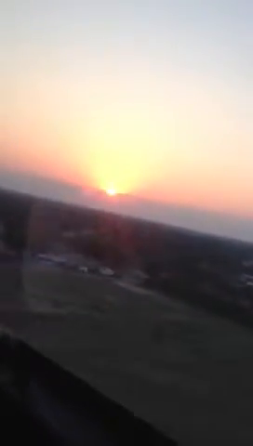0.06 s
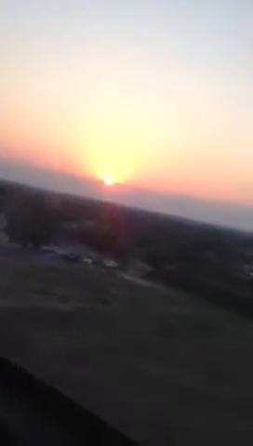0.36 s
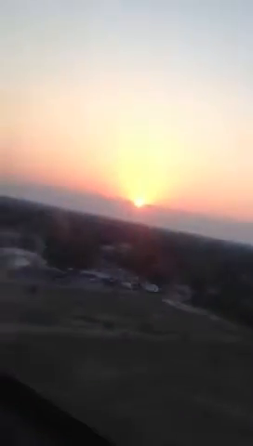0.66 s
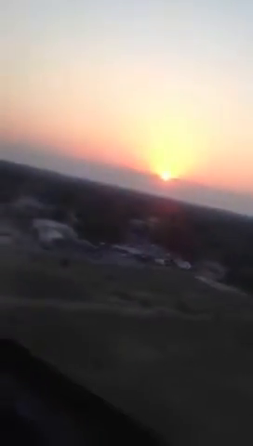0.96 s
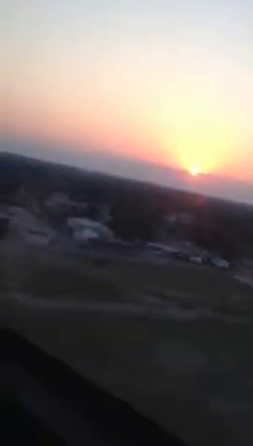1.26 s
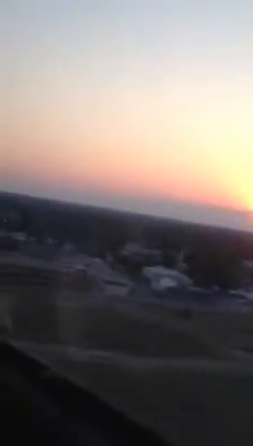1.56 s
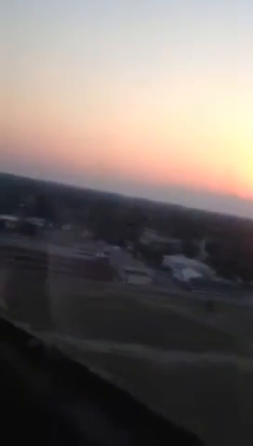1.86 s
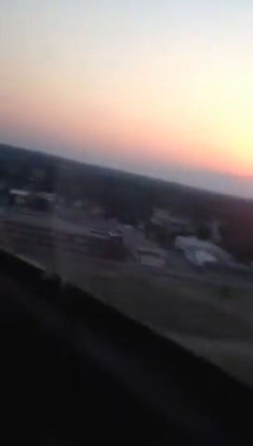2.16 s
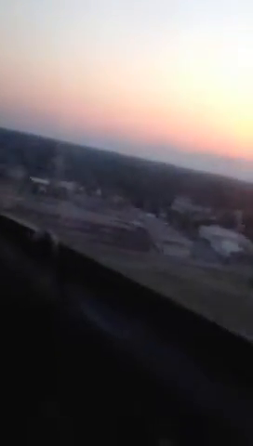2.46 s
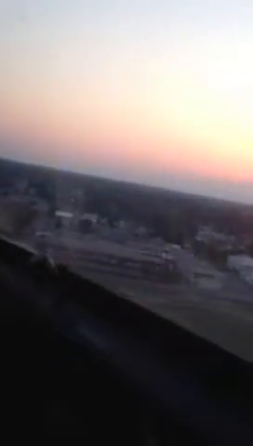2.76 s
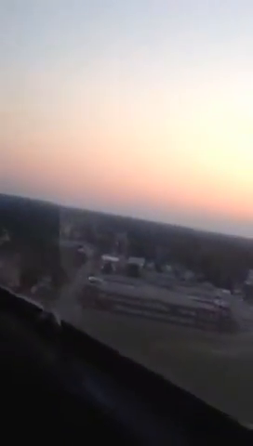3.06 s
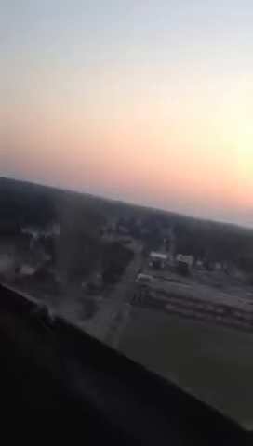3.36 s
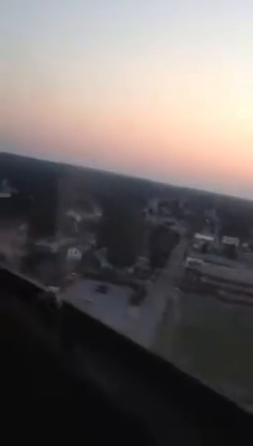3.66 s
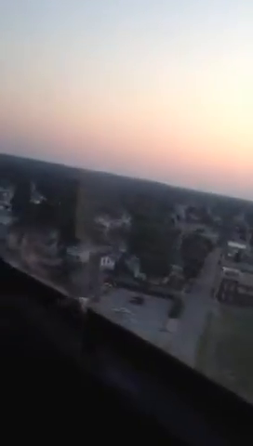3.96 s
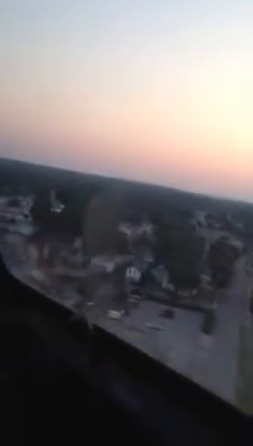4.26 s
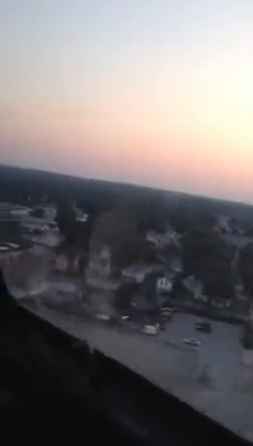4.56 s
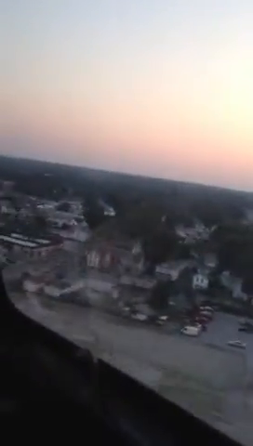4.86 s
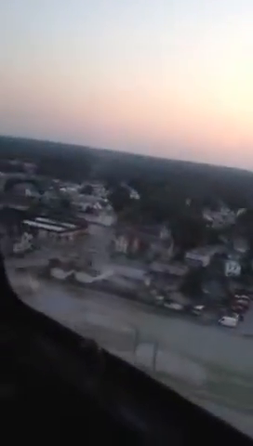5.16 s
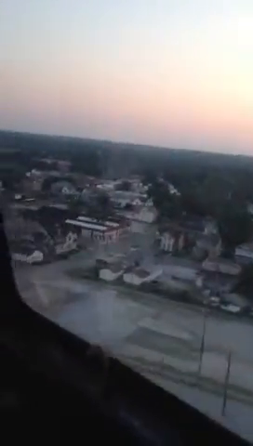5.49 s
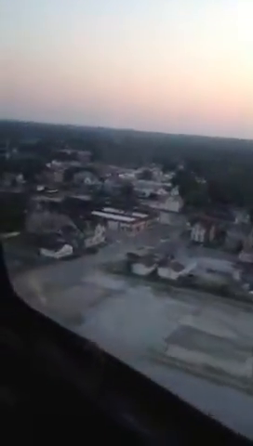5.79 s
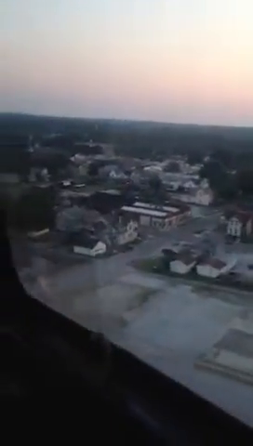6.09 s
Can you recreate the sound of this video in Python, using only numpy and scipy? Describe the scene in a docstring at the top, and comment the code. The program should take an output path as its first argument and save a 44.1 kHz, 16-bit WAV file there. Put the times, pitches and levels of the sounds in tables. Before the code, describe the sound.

A small helicopter's piston engine drones loudly and close for the whole six seconds, heard through one microphone at a seat inside the cabin in level flight. Its low pitch barely moves, but the boom swells around 0.6 to 1.5 seconds, again near 2.8, and most strongly at about 4.2, then eases near 5. Beneath it the cabin shell rumbles steadily, with faint, wavering tones from the gears and tail rotor. Overhead, the blades push gusts over the cabin in a fast, even chop, about thirteen or fourteen a second, each followed by a thin, high whistling hiss through the door seals. The gusts grow a little stronger around 3.5 and 5.3 seconds. Brief blade slaps, hollow thuds with a slight crack, come softly at 0.5 and 0.8 seconds, cluster from 3.3 to the strongest at 3.7, then recur now and then until 5.9.

```python
"""A six-cylinder engine drones close by, heard from a seat inside a small piston helicopter in level flight.
The drone booms louder whenever the engine runs a little faster; tail rotor and gear tones keep in step.
Overhead, each pass of the two main blades pushes a gust over the cabin and a whistling hiss through
the door seals; now and then a blade slaps. All around the single microphone the cabin shell rumbles."""
import sys
import numpy as np
from scipy import signal
from scipy.fft import rfft, irfft
from scipy.io import wavfile
from scipy.ndimage import uniform_filter1d, minimum_filter1d

SR = 44100
rng = np.random.default_rng(int(sys.argv[2]) if len(sys.argv) > 2 else 0)


def transcribe(u):
    """Save the signal u as a 16-bit wav file named by the first command-line argument.

    u: samples, shape (n,) or (channels, n), limited to [-1, 1]; the rate is SR.
    q: integer samples, one column per channel.
    """
    v = np.clip(np.atleast_2d(u).T, -1, 1)
    q = np.round(v * 32767).astype(np.int16)
    wavfile.write(sys.argv[1], SR, q)


N = 270333
TIME = np.arange(N) / SR


# engine speed in level flight: (time [s], firing rate [Hz])
ENGINE_SPEED = [(0.0, 135.5), (0.6, 136.47), (1.3, 136.3), (1.85, 135.03), (2.6, 136.19), (3.3, 135.37),
                (4.05, 137.11), (4.8, 134.78), (5.6, 135.54), (6.13, 136.02)]
# lines of the uneven cylinders, from the seat: (multiple of the six-firing cycle, level [dB])
CYLINDER_LINES = [(5, -32.5), (7, -37), (9, -35.5), (11, -45.5), (12, -33), (13, -39.5), (14, -43.5),
                  (15, -40.5), (16, -44), (18, -45.5), (20, -54), (21, -41), (24, -38.5), (26, -49.5),
                  (27, -45.5), (28, -60.5), (29, -52), (30, -51), (39, -58), (42, -58.5), (48, -57.5),
                  (51, -63), (54, -56), (66, -54.5)]

def engine(firings, blades, db_per_hz=1.7, lag_s=0.18):
    """The firing tone booms, swells with speed and throbs with the rotor; unequal cylinders add lines."""
    firing_hz, = follow(ENGINE_SPEED)
    excess_hz = np.interp(TIME - lag_s, TIME, firing_hz - firing_hz.mean())
    boom_db = -9.5 + db_per_hz * excess_hz + 0.4 * wander(4.2)
    # level and phase move once per blade and once per rotor turn
    throb_db = 0.55 * np.cos(2 * np.pi * (blades - .21)) + 0.67 * np.cos(np.pi * (blades + 0.13))
    sway = 0.11 * np.cos(2 * np.pi * (blades - .42)) + 0.036 * np.cos(np.pi * (blades - .54))
    boom = gain_of(boom_db + throb_db + 0.5 * wander(37)) * np.sin(2 * np.pi * firings + sway)
    cycles = firings / 6
    lines = sum(gain_of(db) * tone(k * cycles, waver_db=2.0, waver_hz=13.0) for k, db in CYLINDER_LINES)
    return boom + lines


# rotor air at the microphone: (time [s], relative gust level [dB], hiss level [dB])
AIR_LEVELS = [(0.0, -34, -42), (1.3, -34, -43), (2.4, -32.5, -41), (3.5, -29.5, -42), (4.5, -34, -42.5),
              (5.3, -30, -41), (6.13, -33, -43.5)]

def rotor_wash(firings, blades):
    """Each blade sends a gust over the cabin; the door seals hiss just after it."""
    gust_db, hiss_db = follow(AIR_LEVELS)
    return gain_of(gust_db + 2.5) * gusts(firings, blades) + gain_of(hiss_db) * seal_hiss(blades)


# gusts on the cabin, just overhead: (frequency [Hz], relative level [dB])
GUST_SPECTRUM = [(100, -22), (250, 3.5), (480, 0), (680, -2.5), (880, -15), (1150, -11), (1850, -19),
                 (2100, -23), (2650, -26), (3400, -28.5), (4300, -32.5), (7000, -27.5), (15000, -65)]
# resonances of the panels around the seat: (frequency [Hz], width [Hz], lift [dB])
PANEL_RESONANCES = [(716, 27, 4.5), (1084, 79, 1.5), (1407, 100, 3.5), (1575, 33, 2.5), (1754, 62, 3.5),
                    (1924, 45, 4.5), (2345, 83, 6), (3130, 190, 1.5)]
# swell of one gust: (start, attack, hold, release [blade passes], sag, depth [dB])
GUST_SWELL = (.02, .22, .28, .42, 1.5, 11)

def gusts(firings, blades):
    """Ragged pushes of air, each with a sharp front, stir the cabin panels."""
    ragged = eddies(per_s=79, life_s=0.0081, size=.6) * gain_of(0.42 * wander(32))
    pulse = 1 + 0.042 * np.cos(2 * np.pi * firings)
    push = blade_swell(blades, *GUST_SWELL) + chop(blades)
    air = patchy(noise(GUST_SPECTRUM, PANEL_RESONANCES), depth_db=3.0, above_hz=760)
    return unit_rms(air * ragged * pulse * push)


def chop(blades, start=0.29, rise=0.024, fall=0.27, spread_db=2.5):
    """A sharp push as each blade goes by, never twice of the same strength; times are in blade passes."""
    number, age = np.divmod(blades - start + 1, 1)
    strength_db = -11.5 + spread_db * rng.uniform(-0.82, 1, size=128)[number.astype(int)]
    return gain_of(strength_db) * (1 - np.exp(-age / rise)) * np.exp(-age / fall)


# air through the door seals, beside the seat: (frequency [Hz], relative level [dB])
SEAL_SPECTRUM = [(1500, -41), (3000, -10), (4200, -12), (5000, -8.5), (5900, -6.5), (6650, -7), (7250, -2),
                 (7700, 1), (8250, -7.5), (9100, -13.5), (10200, -18.5), (12300, -24), (14000, -31.5),
                 (15200, -40)]
# whistles of the gaps: (frequency [Hz], width [Hz], lift [dB])
GAP_WHISTLES = [(6000, 200, 0.5), (6990, 90, 0.5), (7290, 90, 4.5), (7500, 120, 1.5)]
# swell of one hiss: (start, attack, hold, release [blade passes], sag, depth [dB])
SEAL_SWELL = (0.15, .22, 0.29, 0.3, 1.8, 11.2)

def seal_hiss(blades):
    """Air flutters and whistles through gaps in the door seals with every blade pass."""
    flutter = gain_of(0.23 * wander(10)) * eddies(per_s=92, life_s=0.0034, size=.3)
    return unit_rms(noise(SEAL_SPECTRUM, GAP_WHISTLES) * flutter * blade_swell(blades, *SEAL_SWELL))


# slaps, from under the rotor: (time [s], level [dB], crack against thud [dB])
BLADE_SLAPS = [(0.508, -23, -25), (0.796, -21.5, -10.5), (3.308, -19.5, -10.5), (3.458, -23, -8),
               (3.606, -20.5, -11), (3.671, -11.5, -21), (4.11, -20.5, -25), (4.641, -21, -22),
               (5.301, -16.5, -7.5), (5.735, -19, -20), (5.883, -15, -23)]
# the thud and the crack of a slap: (frequency [Hz], relative level [dB])
THUD_SPECTRUM = [(120, -31), (300, 7.5), (540, 11), (900, -0.5), (1600, -14), (2600, -22), (5000, -48)]
CRACK_SPECTRUM = [(600, -19), (1600, 13), (2500, 7.5), (3500, -2), (6000, 0), (10000, -21), (15000, -41)]
# hollow ring of the cabin under a slap: (frequency [Hz], width [Hz], lift [dB])
CABIN_RING = [(500, 81, 2)]

def blade_slaps(rise_s=0.00071, thud_t60=0.11, crack_t60=0.082, front_db=6, front_s=0.0018):
    """A blade cuts a tip vortex: a crack with a hard front over a hollow thud."""
    body, treble = noise(THUD_SPECTRUM, CABIN_RING), noise(CRACK_SPECTRUM)
    out = np.zeros(N)
    for start_s, db, crack_db in BLADE_SLAPS:
        start = round(start_s * SR)
        span = slice(start, start + SR // 8)
        age = TIME[span] - TIME[start]
        thud = gain_of(-60 * age / thud_t60) * body[span]
        crack = gain_of(crack_db + front_db * np.exp(-age / front_s) - 60 * age / crack_t60) * treble[span]
        out[span] += gain_of(db) * (1 - np.exp(-age / rise_s)) * (thud + crack)
    return out


# loudest gear tone, from the seat: (time [s], level [dB])
GEAR_LEVEL = [(0.0, -28), (0.4, -38), (0.8, -28.5), (1.7, -28.5), (2.2, -34), (3.4, -33), (4.8, -31),
              (6.13, -31.5)]
# tail rotor blade rate, its overtone and the lesser gears: (multiple of the firing rate), (level [dB])
DRIVE_RATIOS = [.594, 1.782, 2.728, 3.363, 3.846]
DRIVE_LEVELS = [-39, -45.5, -40.5, -43, -50]

def drive_train(firings, gear_ratio=2.846):
    """Tail rotor and gears keep in step with the engine."""
    gear_db, = follow(GEAR_LEVEL)
    gear = gain_of(gear_db) * tone(gear_ratio * firings, waver_db=1.6, waver_hz=2.2)
    return gear + sum(gain_of(db) * tone(ratio * firings, waver_db=6.0, waver_hz=2.4)
                      for ratio, db in zip(DRIVE_RATIOS, DRIVE_LEVELS))


# cabin shell, all around the microphone: (frequency [Hz], relative level [dB])
SHELL_SPECTRUM = [(15, -39.5), (48, -24.5), (75, -10), (105, -3), (165, 5.5), (205, 1.5), (245, -4.5),
                  (380, -6), (520, -12), (700, -19), (880, -24.5), (1800, -33), (3600, -40), (12000, -63),
                  (15000, -83)]

def shell_rumble(firings):
    """Exhaust roar and airflow shake the shell, pulsing slightly with each firing."""
    pulse = 1 + 0.052 * np.cos(2 * np.pi * firings)
    return gain_of(-20.0) * unit_rms(noise(SHELL_SPECTRUM) * pulse * gain_of(1.14 * wander(23)))


def blade_swell(blades, start, attack, hold, release, sag_db, depth_db):
    """A gain of rms 1 that swells, sags and falls with every blade pass."""
    corners = np.cumsum([0, attack, hold, release])
    swell_db = np.interp((blades - start) % 1, corners, [-depth_db, 0, -sag_db, -depth_db])
    return unit_rms(gain_of(swell_db))


def eddies(per_s, life_s, size):
    """A gain that jumps as each eddy strikes and then settles back."""
    hits = (rng.random(N) < per_s / SR) * rng.uniform(0.42, 1, N)
    return 1 + size * signal.lfilter([1], [1, -np.exp(-1 / (life_s * SR))], hits)


def patchy(x, depth_db, above_hz):
    """Turbulence favours now one narrow band, now another, mostly above the given frequency."""
    hz, _, bands = signal.stft(x, SR, nperseg=1024, noverlap=512)
    patches = uniform_filter1d(rng.standard_normal(bands.shape), size=3, axis=0)
    patches = unit_rms(uniform_filter1d(patches, size=4, axis=1))
    band_depth_db = depth_db * np.minimum(hz / above_hz, 1)[:, None] ** 2
    _, stirred = signal.istft(bands * gain_of(band_depth_db * patches), nperseg=1024, noverlap=512)
    return unit_rms(stirred[:N])


def tone(turns, waver_db, waver_hz):
    """A line of rms 1 whose strength and phase are stirred by turbulent air."""
    stir = np.log(10) / 20 * waver_db
    strength = np.exp(stir * wander(waver_hz))
    return unit_rms(strength * np.sin(2 * np.pi * turns + stir * wander(waver_hz)))


def noise(spectrum, resonances=()):
    """Noise of rms 1 with the given spectral density, lifted by any resonances."""
    hz, db = np.transpose(spectrum)
    f = np.fft.rfftfreq(N, 1 / SR)
    shape_db = np.interp(np.log(f + 1), np.log(hz + 1), db)
    lift_db = sum(lift / (1 + (2 * (f - centre) / width) ** 2) for centre, width, lift in resonances)
    return unit_rms(irfft(rfft(rng.standard_normal(N)) * gain_of(shape_db + lift_db), N))


def wander(rate_hz):
    """Random drift of rms 1, up to about the given rate."""
    ticks = np.linspace(0, TIME[-1], 2048)
    f = np.fft.rfftfreq(len(ticks), ticks[1])
    drift = irfft(rfft(rng.standard_normal(len(ticks))) * np.exp(-(f / rate_hz) ** 2))
    return unit_rms(np.interp(TIME, ticks, drift))


def follow(rows):
    """Each column of a time table at every sample."""
    times, *columns = np.transpose(rows)
    return [np.interp(TIME, times, column) for column in columns]


def gain_of(db):
    """Decibels to amplitude."""
    return 10 ** (np.asarray(db) / 20)


def unit_rms(x):
    """Scales to rms 1."""
    return x / np.sqrt(np.mean(x ** 2) + 1e-20)


def scene(firings_per_blade=10.017):
    """The cabin in mono, from the seat: one shaft speed drives engine, gears and rotors."""
    firings = np.cumsum(follow(ENGINE_SPEED)[0]) / SR
    blades = firings / firings_per_blade + .303
    machinery = engine(firings, blades) + drive_train(firings) + shell_rumble(firings)
    return (machinery + rotor_wash(firings, blades) + blade_slaps())[None]


def record(dry, ceiling_db=-3, cutoff_hz=15200):
    """After the microphone, a limiter holds the highest peaks down and a low-pass trims the top."""
    allowed_gain = np.minimum(1, gain_of(ceiling_db) / (abs(dry) + 1e-9))
    limited = dry * uniform_filter1d(minimum_filter1d(allowed_gain, size=500), size=500)
    low_pass = signal.firwin(511, cutoff_hz, window=("kaiser", 9), fs=SR)
    return signal.oaconvolve(limited, low_pass[None], "same")


dry = scene()
out = record(dry)
transcribe(out)
```